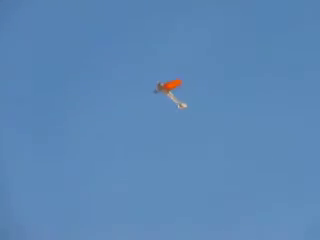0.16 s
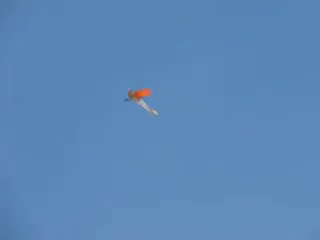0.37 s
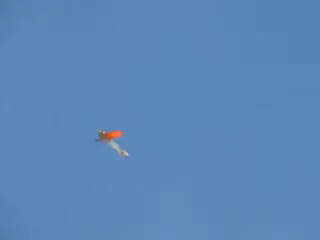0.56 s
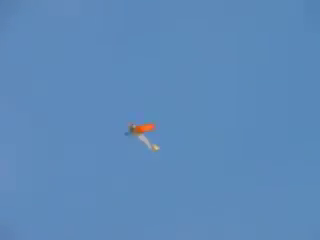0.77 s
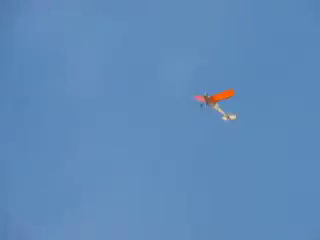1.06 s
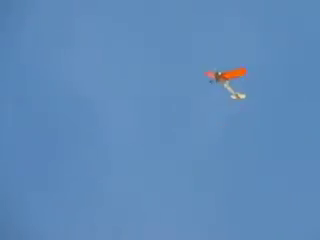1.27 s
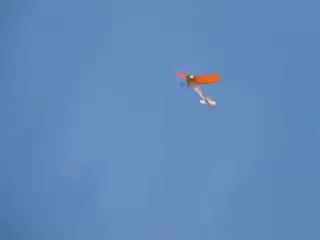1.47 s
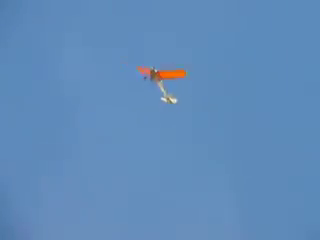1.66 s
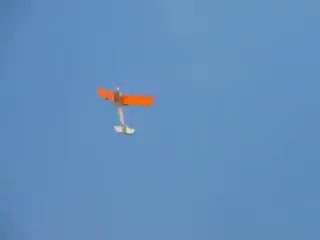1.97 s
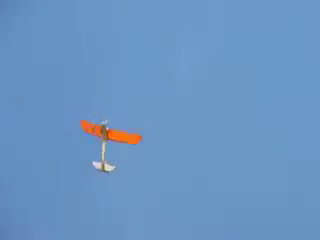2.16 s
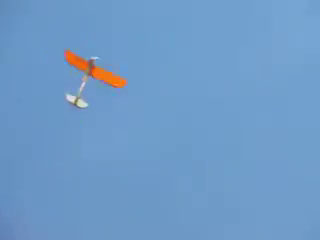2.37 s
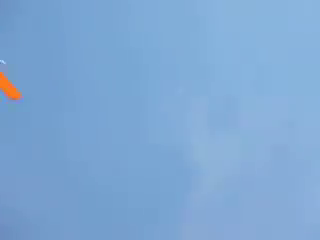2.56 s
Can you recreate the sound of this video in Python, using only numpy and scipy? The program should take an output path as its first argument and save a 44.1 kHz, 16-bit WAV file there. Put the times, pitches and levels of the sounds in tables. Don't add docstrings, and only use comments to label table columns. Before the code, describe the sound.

A small model airplane engine drones thin and raspy in the distance outdoors, while a strong gust batters the bare microphone with low fluttering pops, then eases to leave the buzz clearer.

```python
import sys
import numpy as np
from scipy import signal
from scipy.fft import rfft, irfft
from scipy.io import wavfile
from scipy.ndimage import uniform_filter1d, map_coordinates

SR = 44100
rng = np.random.default_rng(int(sys.argv[2]) if len(sys.argv) > 2 else 0)


def ratio_of_db(decibels):
    return 10 ** (np.asarray(decibels, float) / 20)


def generate_wav(signal):
    frames = np.transpose(np.atleast_2d(signal))
    scaled = np.clip(frames, -1, 1) * 32767
    pcm = np.round(scaled).astype(np.int16)
    wavfile.write(sys.argv[1], SR, pcm)


N = 119070
T = np.arange(N) / SR


def evened(x):
    return x / np.sqrt(np.mean(x ** 2) + 1e-20)


def curve(table, column=1):
    rows = np.array(table)
    return np.interp(T, rows[:, 0], rows[:, column])


def drift(seconds):
    span = max(int(seconds * SR), 2)
    once = uniform_filter1d(rng.standard_normal(N), span)
    return evened(uniform_filter1d(once, span))


# time_s, level_db
BREEZE_LEVEL = [(0.0, -32.5), (0.15, -31.5), (0.19, -17), (0.34, -24), (0.48, -28), (0.71, -29),
                (0.95, -36), (1.13, -34.5), (1.27, -29), (1.38, -32.5), (1.44, -45.5), (1.68, -38.5),
                (2.0, -31), (2.7, -37)]
# freq_hz, level_db (per Hz)
BREEZE_COLOUR = [
    (20, -16.5),
    (45, -8.5),
    (100, -8.5),
    (200, -9.5),
    (400, -29.5),
    (700, -21),
]


def breeze():
    lump_db, top_hz = 7, 800
    hz = np.fft.rfftfreq(N, 1 / SR)
    freq, db = np.transpose(BREEZE_COLOUR)
    colour = ratio_of_db(np.interp(np.log(hz + 1), np.log(freq), db))
    colour = colour / (1 + (hz / top_hz) ** 6)
    rumble = irfft(rfft(rng.standard_normal(N)) * colour, N)
    lumps = ratio_of_db(lump_db * np.minimum(drift(0.027), 1))
    return evened(rumble * lumps) * ratio_of_db(curve(BREEZE_LEVEL))


def pop(hz, lean):
    pop_cycles, snap_db, snap_ratio = 0.32, -24, 5.3
    cycles = np.arange(-700, 701) / SR * hz

    def burst(v):
        return np.exp(-.5 * (v / pop_cycles) ** 2) * np.cos(2 * np.pi * v + lean)

    return (burst(cycles) + ratio_of_db(snap_db) * burst(snap_ratio * cycles)) * np.hanning(1401)


# start_s, length_s, level_db, pitch_hz
GUST_RUNS = [(0.108, 0.068, -21, 260), (0.174, 0.08, -11.5, 196), (0.246, .118, -18.5, 210),
             (0.37, 0.026, -50, 205), (0.404, .14, -15, 235), (0.557, 0.03, -32, 253),
             (0.599, 0.067, -20, 241), (0.677, .016, -18, 255), (0.771, .02, -16.5, 254),
             (0.859, 0.029, -19, 223), (0.917, .148, -18.5, 213), (1.071, 0.15, -39, 216),
             (1.205, 0.13, -20.5, 169), (1.351, 0.077, -22.5, 202), (1.568, 0.07, -33.5, 195),
             (1.754, 0.064, -31, 233), (1.867, 0.064, -33, 205), (1.968, 0.15, -36, 163),
             (2.24, 0.072, -31, 127), (2.393, 0.0212, -22, 130), (2.498, 0.18, -30.5, 141)]
# time_s, peak_db, pitch_hz
SINGLE_POPS = [(0.005, -32, 438), (0.023, -29, 448), (0.075, -28, 359), (0.122, -21, 297),
               (0.137, -34.5, 420), (0.157, -36, 295), (0.174, -7, 221), (0.184, -9.5, 211),
               (0.198, -5, 250), (0.213, -8.5, 311), (0.221, -9.5, 385), (0.239, -11, 211),
               (0.248, -15.5, 225), (0.259, -15, 255), (0.273, -11, 230), (0.283, -3, 221),
               (0.293, -4, 274), (0.31, -8.5, 285), (0.321, -17, 226), (0.342, -15, 199), (0.353, -23, 294),
               (0.359, -8.5, 274), (0.377, -13, 276), (0.388, -25, 224), (0.399, -19, 247), (0.41, -8, 291),
               (0.419, -2.5, 256), (0.433, -11, 255), (0.453, -12, 216), (0.466, -10, 452),
               (0.478, -12, 263), (0.491, -6.5, 233), (0.506, -8.5, 368), (0.522, -13, 234),
               (0.536, -6, 221), (0.549, -29, 187), (0.562, -21, 293), (0.575, -18, 295), (0.584, -23, 387),
               (0.606, -7.5, 223), (0.616, -9.5, 362), (0.628, -14, 289), (0.639, -8, 275),
               (0.649, -9.5, 310), (0.662, -6, 259), (0.686, -10.5, 297),
               (0.766, -9, 324), (0.778, -7.5, 407), (0.788, -6, 259), (0.826, -22, 294),
                 (0.862, -14, 285), (0.877, -11, 237), (0.889, -20, 292), (0.926, -13, 291),
                 (0.941, -11.5, 292), (0.949, -10.5, 233), (0.957, -8.5, 336), (0.98, -12.5, 228),
                 (0.991, -18, 246), (1.004, -14, 172), (1.017, -14, 319), (1.029, -13, 209),
                 (1.036, -12, 313), (1.049, -14.5, 215), (1.056, -15, 234), (1.105, -16.5, 258),
                 (1.125, -27, 260), (1.145, -21, 285), (1.163, -19, 246), (1.176, -12, 260),
                 (1.188, -19.5, 310), (1.206, -25, 275), (1.218, -12, 377), (1.231, -12, 211),
                 (1.248, -21, 221), (1.269, -30, 201), (1.277, -11.5, 244), (1.301, -24, 254),
                 (1.31, -34, 239), (1.327, -22.5, 249), (1.357, -30, 256), (1.372, -19, 284),
                 (1.387, -13.5, 225), (1.404, -14, 240), (1.462, -12, 224), (1.804, -19, 272),
                 (1.876, -22.5, 207), (1.887, -19.5, 253), (1.923, -21.5, 266), (1.988, -20, 328),
                 (2.031, -28.5, 227), (2.077, -30, 328), (2.1, -20, 194), (2.223, -9.5, 252),
                 (2.263, -27, 266), (2.387, -24.5, 254), (2.406, -27.5, 245), (2.415, -39, 252),
                 (2.536, -25.5, 221), (2.634, -21, 281), (2.643, -31.5, 235)]
# time_s, peak_db, pitch_hz
HIGH_FLICKS = [(.212, -19, 600), (.226, -9, 600), (.233, -16, 900), (.292, -15, 600), (.363, -16.5, 700),
               (.467, -16.5, 650), (0.49, -17, 600), (.528, -12, 850), (.637, -19, 600), (.686, -18, 615),
               (.766, -22, 650), (0.788, -28, 800), (.821, -30, 700), (.956, -31, 650), (1.006, -24.5, 640),
               (1.22, -17.5, 575), (1.278, -26, 700)]


def gusts():
    pops_per_s, pitch_spread, size_db, trim_db = 180, 0.65, 4.5, -6
    out = np.zeros(N + 1401)
    for start, length, db, hz in GUST_RUNS:
        count = max(int(length * pops_per_s), 2)
        place, tone, size, lean = rng.random((60, 4))[:count].T
        place = (np.arange(len(place)) + place) / len(place)
        for p, h, s, a in zip(place, tone, size, lean):
            at = min(int((start + p * length) * SR), N)
            pitch = hz * np.exp(pitch_spread * (2 * h - 1))
            level = db + trim_db + 7 - size_db * np.log(s + 0.026) - size_db
            out[at:at + 1401] += ratio_of_db(level) * pop(pitch, 2 * np.pi * a)
    singles = SINGLE_POPS + HIGH_FLICKS
    for (s, db, hz), a in zip(singles, rng.random(200)):
        at = int(s * SR)
        out[at:at + 1401] += ratio_of_db(db) * pop(hz, 2 * np.pi * a)
    return out[700:700 + N]


# time_s, rate_hz
FIRING_RATE = [(0, 115.3), (.17, 114.7), (.32, 114.5), (.49, 113.6), (.71, 113.3), (.92, 113.7),
               (1.14, 114.6), (1.43, 116.4), (1.5, 116.8), (1.69, 116.9), (1.81, 117.2), (1.97, 116.7),
               (2.04, 116.1), (2.5, 113.2), (2.7, 112.8)]


def firing_pulses():
    jitter, first_firing, shimmer_db, puff_db, puff_cycles = .0002, .42, 1.0, -15, .3
    twinkle_db, twinkle_rad = 2.0, .35
    turns = np.cumsum(curve(FIRING_RATE) * (1 + jitter * drift(.03))) / SR - first_firing

    twinkle = uniform_filter1d(rng.standard_normal((300, 160)), size=11, axis=0)
    twinkle = evened(uniform_filter1d(twinkle, size=2, axis=1))
    twinkle = twinkle * np.minimum(np.arange(160) % 80 / 30 + .6, 1)

    is_hum = np.arange(80) * FIRING_RATE[0][1] < 1.3 * 1150
    smear = np.where(is_hum, 1.6, .35) * rng.standard_normal(80) + np.pi / 2

    bangs = np.zeros(N)
    for k in range(1, 80):
        swell = np.interp(T * 100, np.arange(300), twinkle[:, k])
        wander = np.interp(T * 100, np.arange(300), twinkle[:, k + 80])
        phase = 2 * np.pi * k * turns + smear[k] + twinkle_rad * wander
        bangs += ratio_of_db(twinkle_db * swell) * np.cos(phase)
    puffs = evened(np.exp(-(turns % 1) / puff_cycles) * rng.standard_normal(N))
    firing = evened(bangs) * ratio_of_db(shimmer_db * drift(.008)) + ratio_of_db(puff_db) * puffs
    return firing, puffs


# time_s, echo_strength (0-1), wash_db
AIR_PATH = [(0, .3, -2), (.2, .3, -8), (.5, .3, -13), (.8, .4, -15), (1.3, .48, -10), (1.8, .6, -7),
            (2.1, .5, -2), (2.7, .45, 0)]
# time_s, lag_ms
GROUND_LAG = [(0, 0.041), (.35, 0.15), (.56, 0.12), (.65, 0.37), (.77, 0.41), (.83, 0.54), (1.15, 0.92),
              (1.25, 1.06), (1.45, 1.56), (1.65, 1.91), (1.75, 2.07), (2.05, 2.76), (2.25, 2.49),
              (2.5, 3.05), (2.7, 3.13)]
# time_s, lag_ms, strength (0-1)
WING_BOUNCE = [(0, .98, .4), (.45, 1.0, .3), (.55, 1.33, .55), (.8, 1.35, .55), (.9, 1.9, .3),
               (1.2, 2.3, .25), (1.5, 2.3, .1), (2.7, 2.3, .1)]


def over_ground(x):
    dull = signal.sosfiltfilt(signal.butter(2, 4200, fs=SR, output="sos"), x)

    def delayed(lag_table):
        return map_coordinates(dull, [np.arange(N) - curve(lag_table) * SR / 1000], order=3, mode="nearest")

    field = curve(AIR_PATH) * delayed(GROUND_LAG) * 1.3
    return x + field + curve(WING_BOUNCE, column=2) * delayed(WING_BOUNCE)


def resonate(x, hz, width):
    return signal.filtfilt(*signal.iirpeak(hz, hz / width, SR), x)


# freq_hz, width_hz, level_db
RESONANCES = [(230, 570, -6), (458, 236, 9), (900, 208, 5.5), (1426, 295, -3), (1795, 346, -3),
              (2100, 490, -5.5), (2466, 170, -11.5), (2939, 566, 2), (3655, 670, 0.5), (4330, 570, -4),
              (5400, 590, -2.5), (6010, 930, -10.5), (6630, 900, -11)]
# time_s, hum_db (body), bark_db (exhaust), ring_db (muffler), tick_db (valves)
TURNING = [(0, 0.5, 1.5, -7, -3), (.07, 3.5, 15, -3, 0.5), (.17, 0.5, 13.5, 8, -1.5),
           (0.2, -7.5, 6.5, -0.5, -6), (.49, -3.5, 1, 3.5, -2.5), (.58, 4, 0.5, 8, -0.5),
           (.66, -1, 8.5, 10, 2.5), (.76, 0.5, 4, 6, 1.5), (.82, 0, 6, 8, 1.5), (.95, 7.5, 10.5, 6.5, -0.5),
           (1.4, -4.5, 0, 1.5, -3.5), (1.75, -4, 3, 2, -2), (2.1, 5, 1.5, 4, -3), (2.4, 8, 7, 6, -3),
           (2.7, 7, 2.5, 3.5, -2)]


def engine():
    flutter_db, tick_hiss_db, tick_lead_s, tick_low_hz = .6, -2, .001, 4800
    band_tops_hz = [1150, 2400, 3400, tick_low_hz]
    firing, puffs = firing_pulses()
    drive = over_ground(firing)
    wash = ratio_of_db(curve(AIR_PATH, column=2))
    bands = np.zeros((5, N))
    for hz, width, db in RESONANCES:
        hiss = (hz > tick_low_hz) * ratio_of_db(tick_hiss_db) * puffs
        wash_noise = wash * (0.68 + (hz / 4000) ** 2) * rng.standard_normal(N)
        ring = resonate(drive + hiss + wash_noise, hz, width)
        bands[np.searchsorted(band_tops_hz, hz)] += ring * ratio_of_db(db + flutter_db * drift(0.2))
    hum, bark, ring, clatter, ticks = bands
    scale = np.hypot(clatter.std(), ticks.std())
    mix = clatter + np.roll(ticks, -int(tick_lead_s * SR)) * ratio_of_db(curve(TURNING, column=4))
    for column, band in enumerate((hum, bark, ring), 1):
        mix = mix + band * ratio_of_db(curve(TURNING, column=column))
    return mix / scale


# time_s, level_db
PLANE_LEVEL = [(0, -38), (.07, -47.5), (.17, -42), (.205, -51), (.4, -49), (.43, -51), (.5, -44.5),
               (.55, -51.5), (.68, -52.5), (.75, -45), (.81, -55.5), (1.04, -56.5), (1.44, -47.5),
               (1.84, -47), (1.97, -44), (2.04, -46.5), (2.55, -47), (2.7, -43)]


def scene():
    ceiling = .4
    wind = ceiling * np.tanh((gusts() + breeze()) / ceiling)
    return (ratio_of_db(curve(PLANE_LEVEL)) * engine() + wind)[None]


def roll_off(x):
    return signal.sosfilt(signal.butter(12, 9195, fs=SR, output="sos"), x)


def record(dry):
    low_hz, top_hz, offset = 76.6, 8440, 0.014
    x = signal.sosfilt(signal.butter(1, low_hz, "high", fs=SR, output="sos"), dry)
    x = signal.sosfilt(signal.butter(22, top_hz, fs=SR, output="sos"), x)
    return roll_off(x + offset)


dry = scene()
out = record(dry)
generate_wav(out)
```